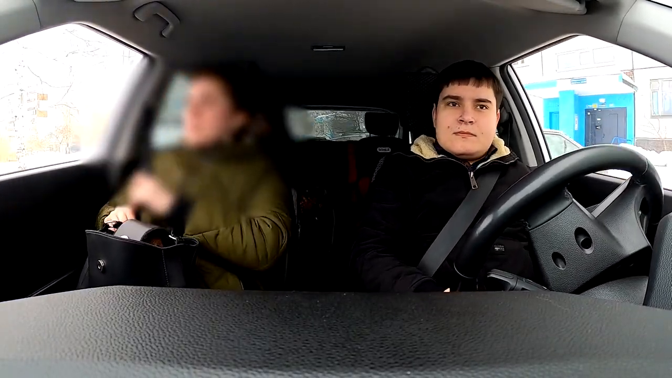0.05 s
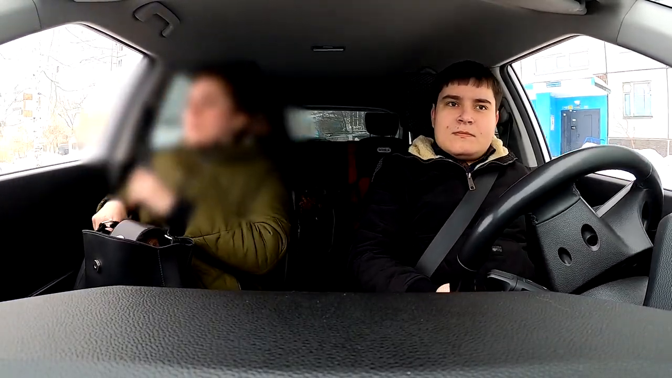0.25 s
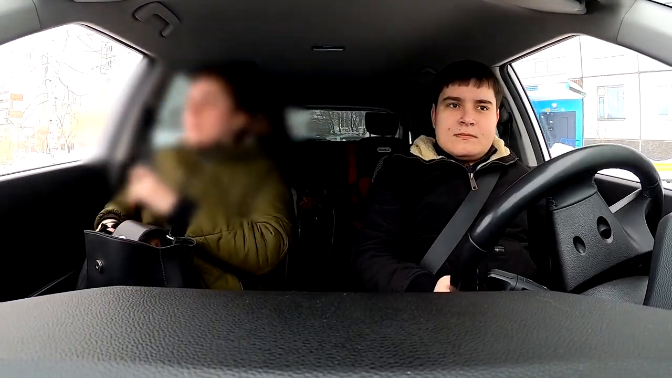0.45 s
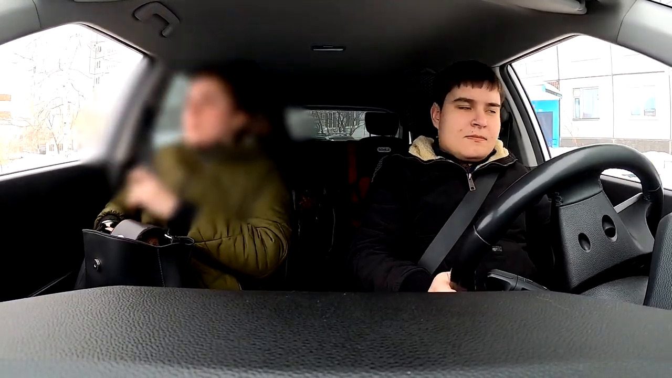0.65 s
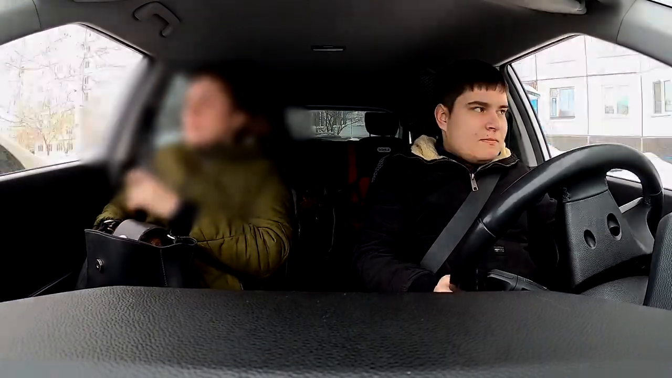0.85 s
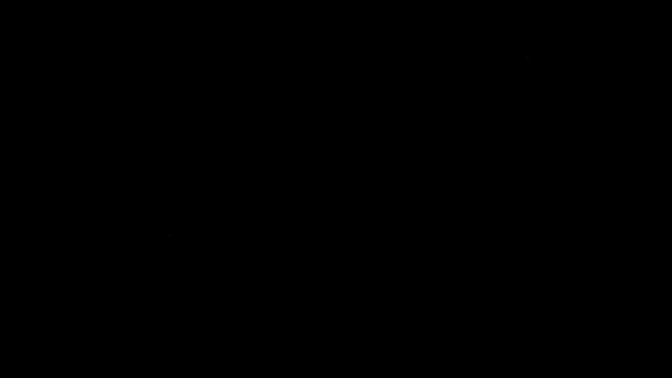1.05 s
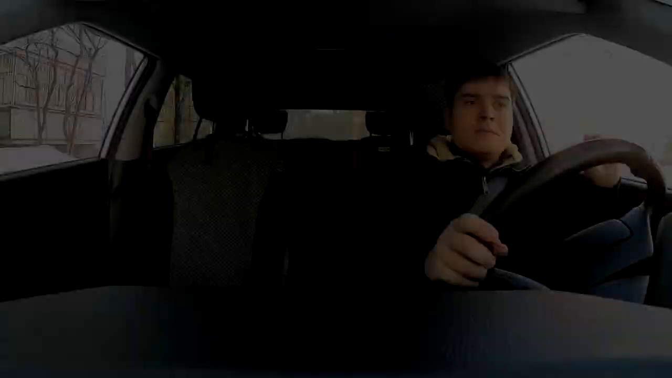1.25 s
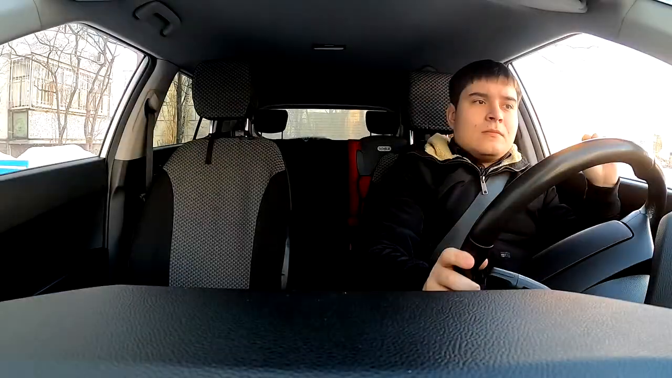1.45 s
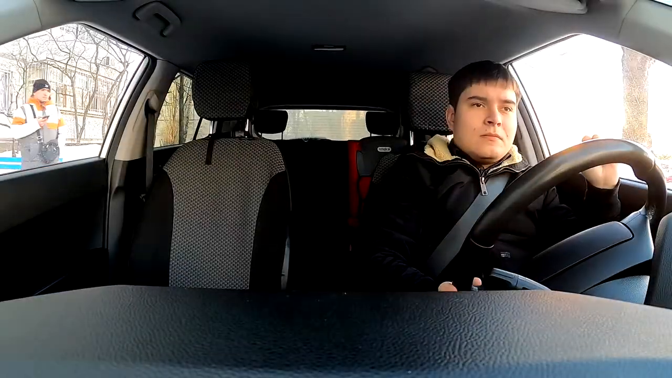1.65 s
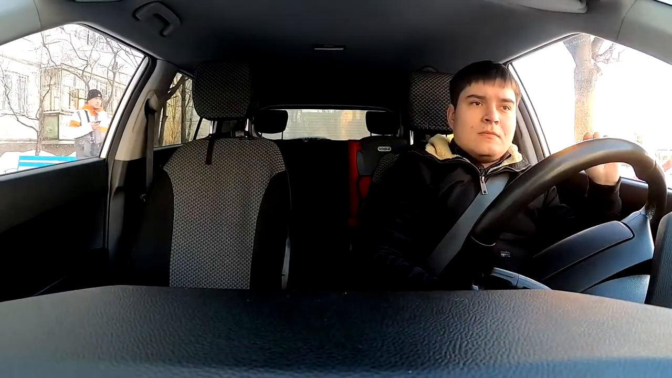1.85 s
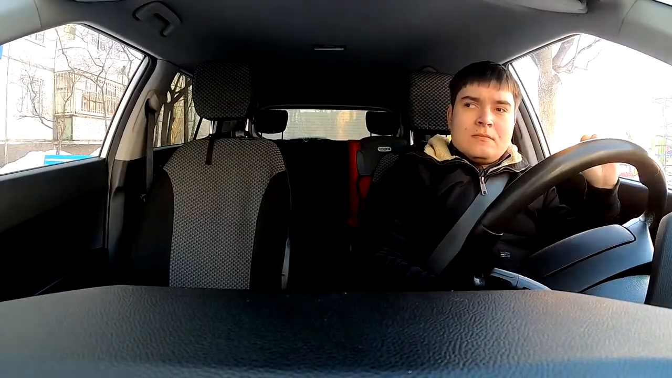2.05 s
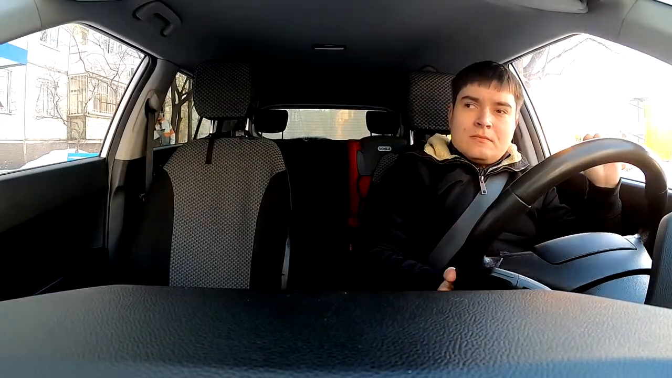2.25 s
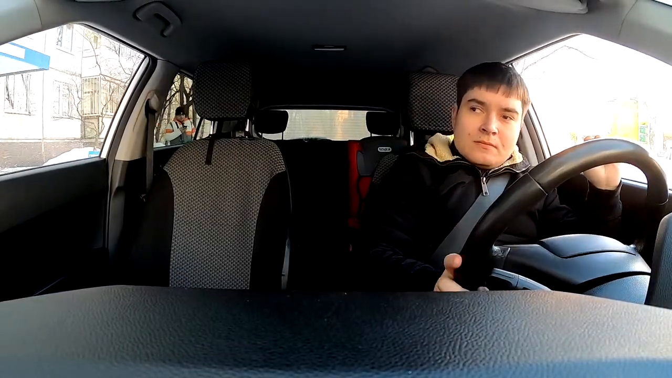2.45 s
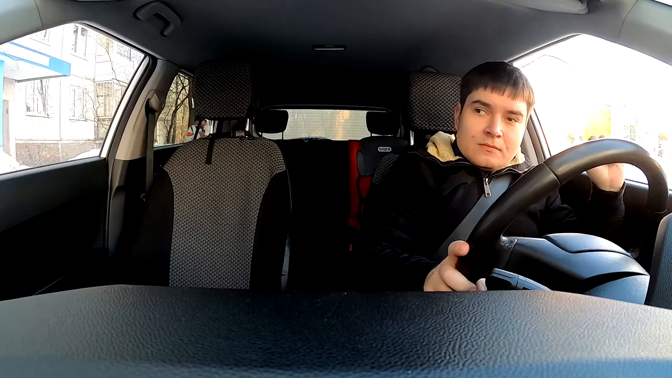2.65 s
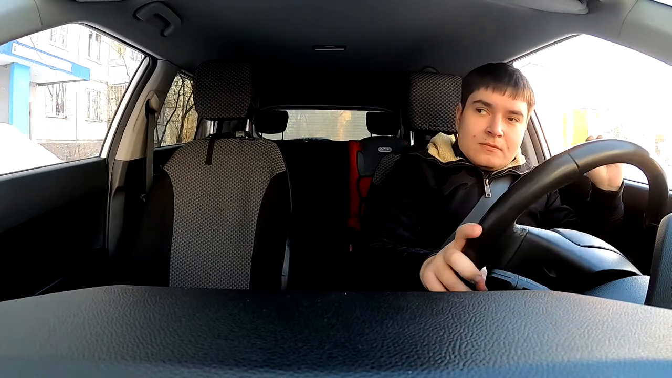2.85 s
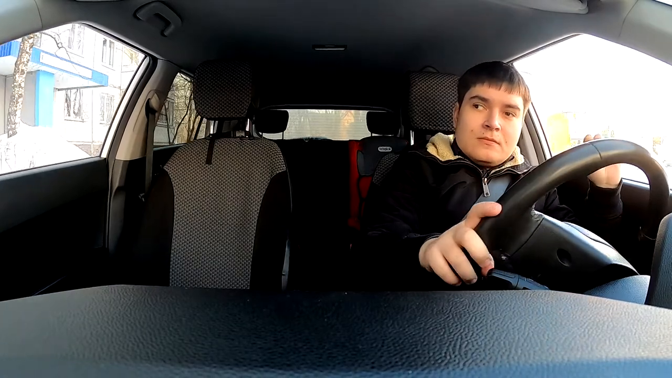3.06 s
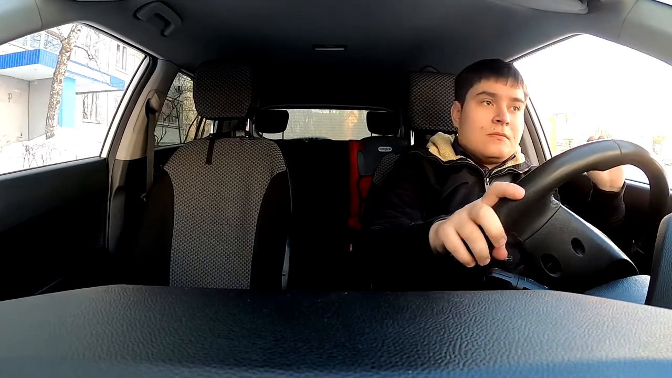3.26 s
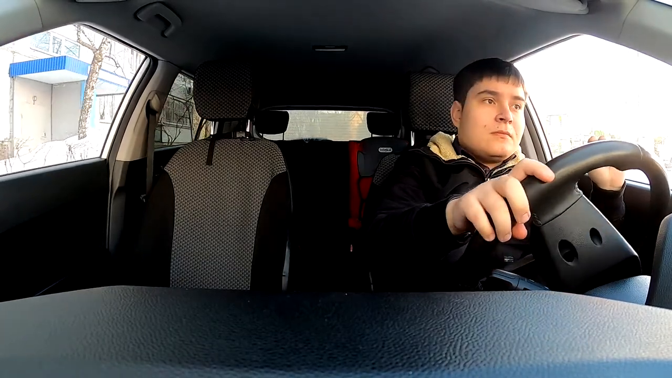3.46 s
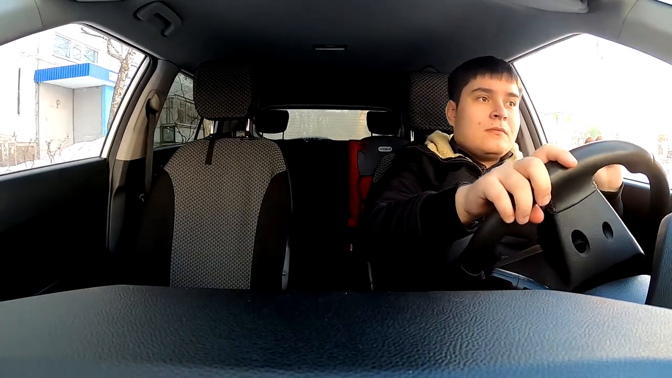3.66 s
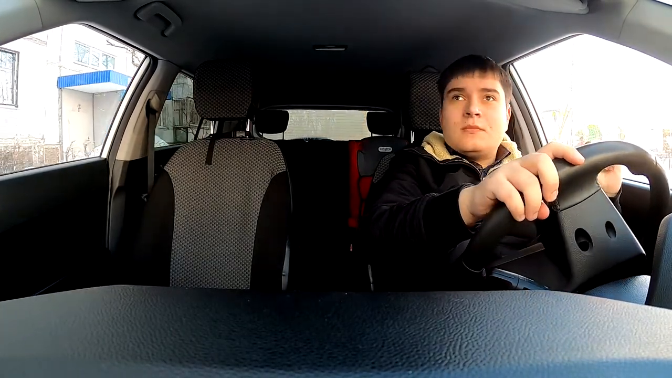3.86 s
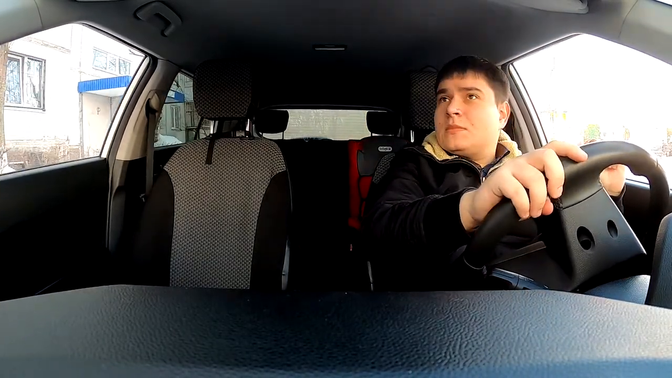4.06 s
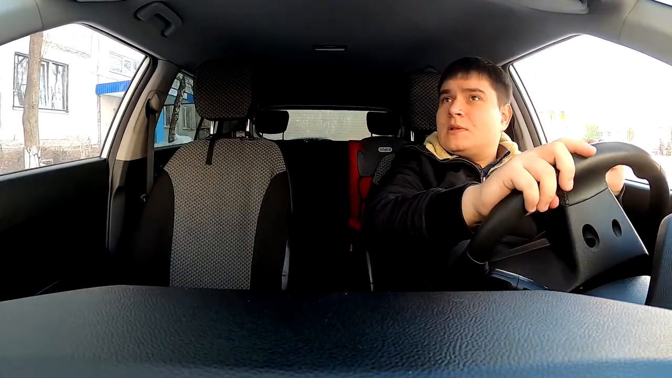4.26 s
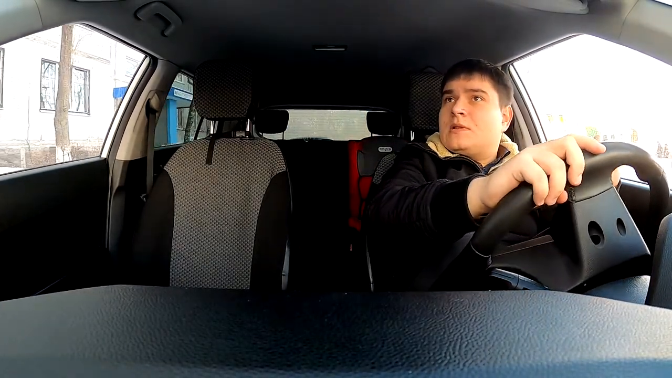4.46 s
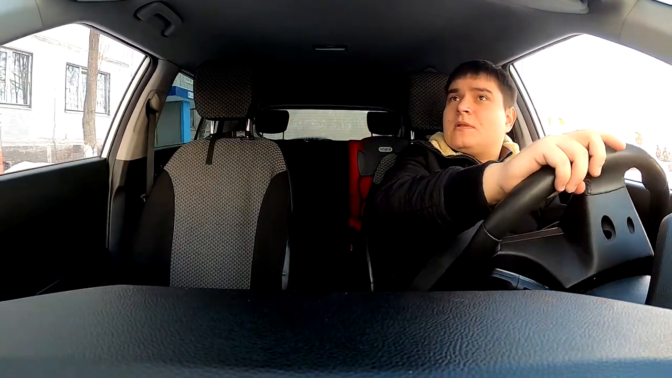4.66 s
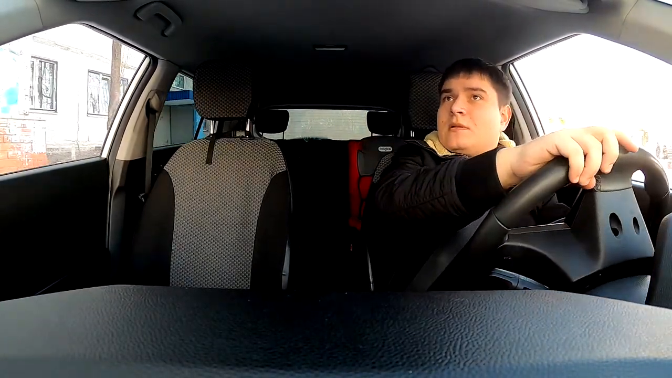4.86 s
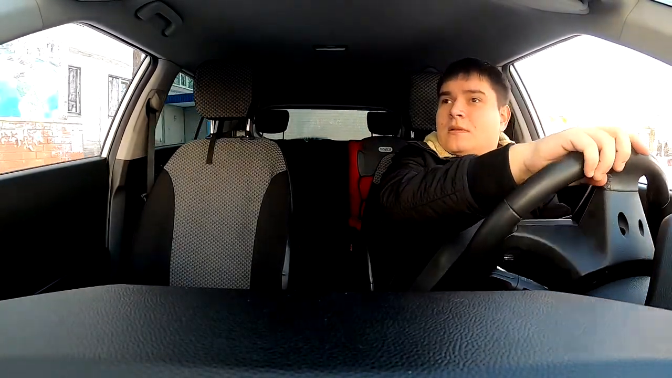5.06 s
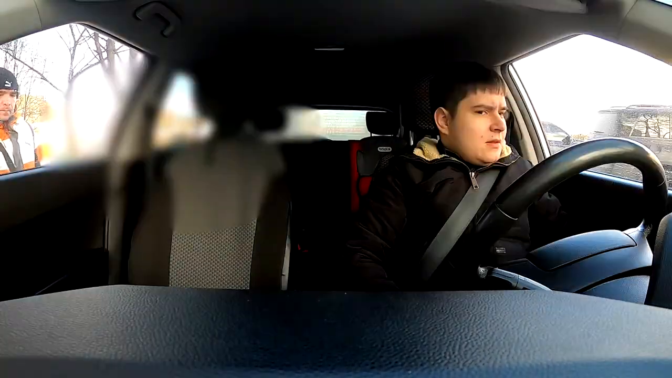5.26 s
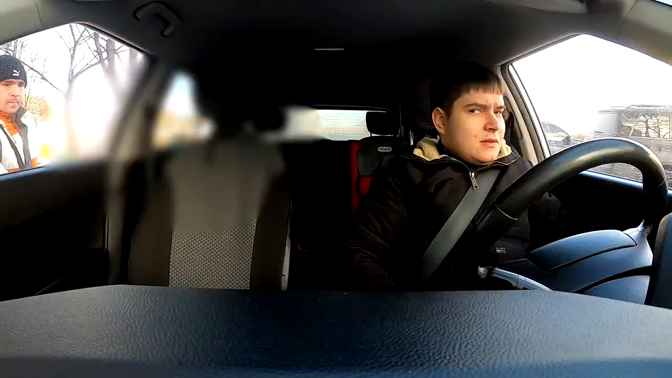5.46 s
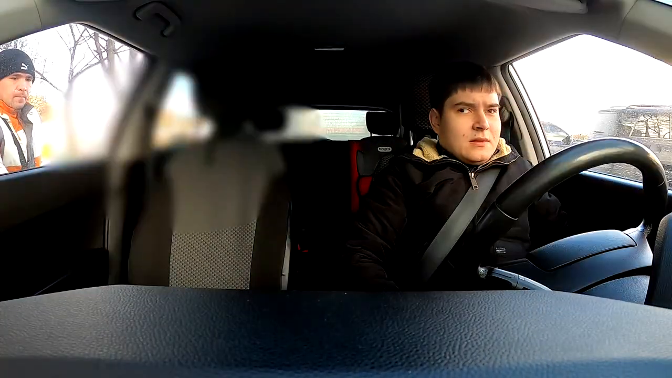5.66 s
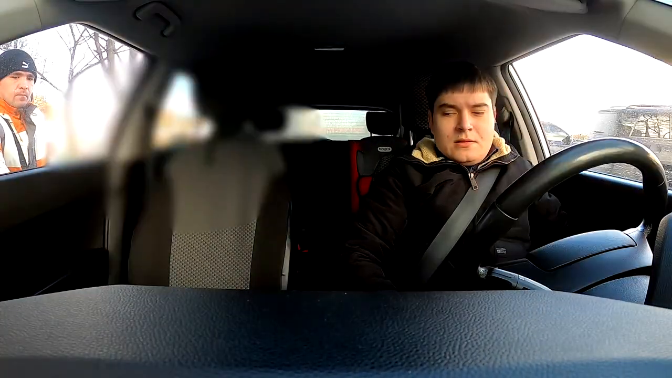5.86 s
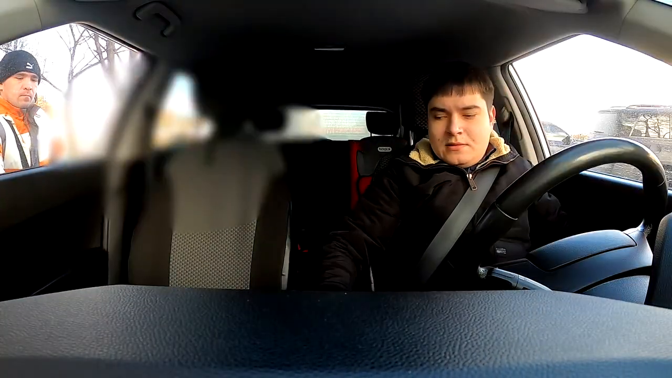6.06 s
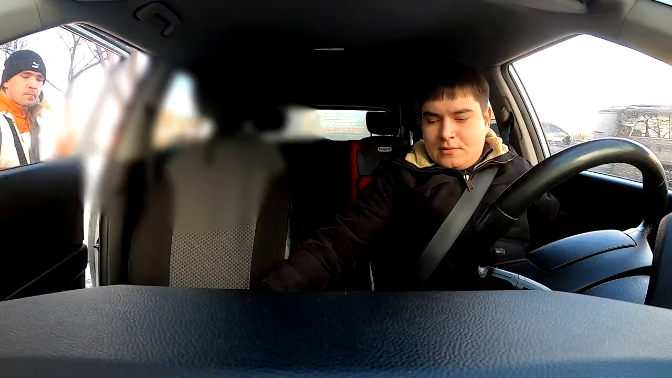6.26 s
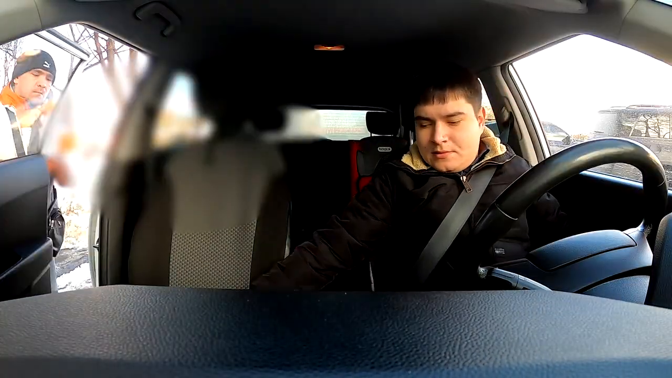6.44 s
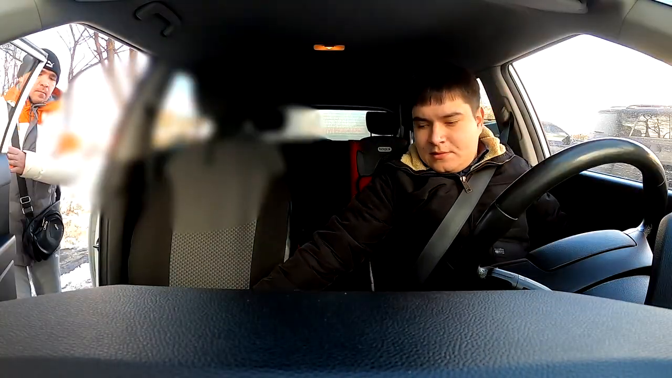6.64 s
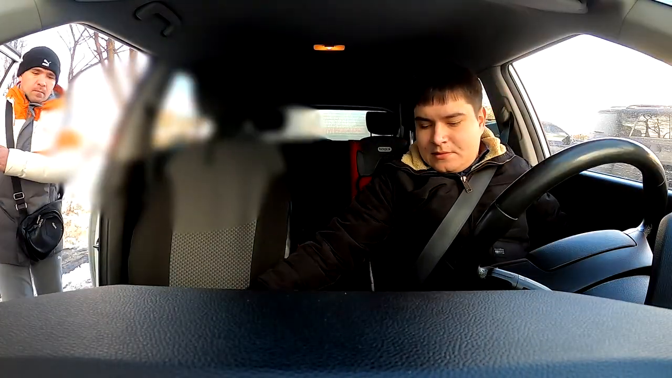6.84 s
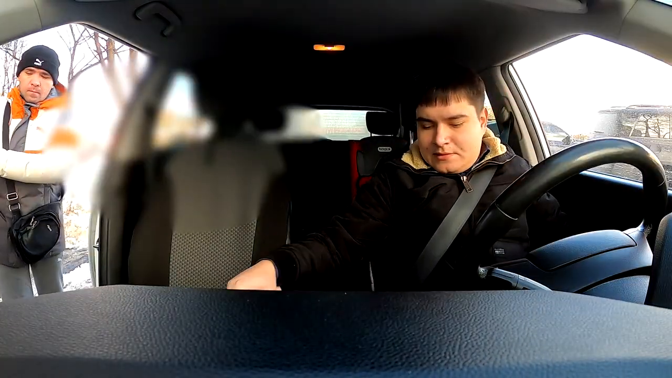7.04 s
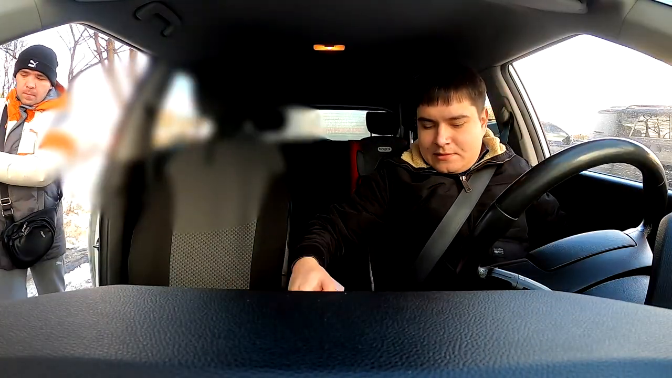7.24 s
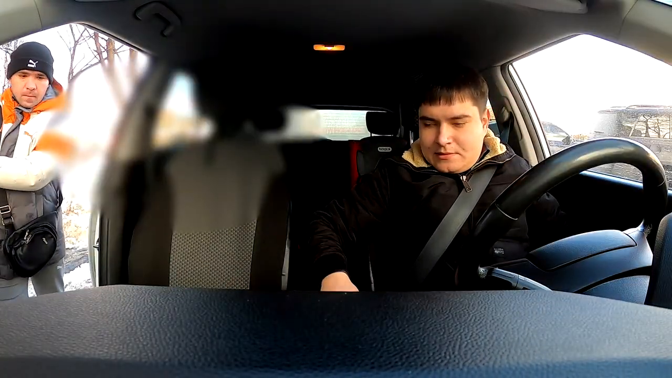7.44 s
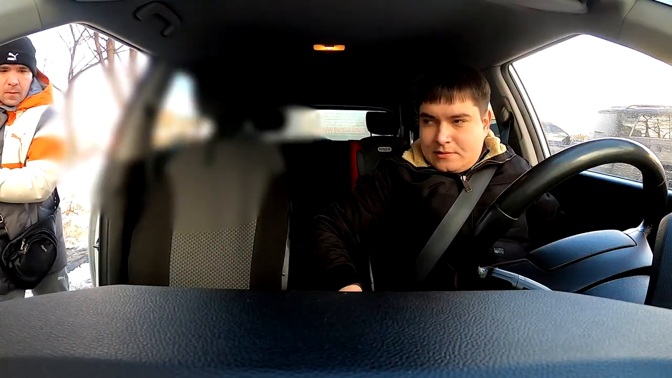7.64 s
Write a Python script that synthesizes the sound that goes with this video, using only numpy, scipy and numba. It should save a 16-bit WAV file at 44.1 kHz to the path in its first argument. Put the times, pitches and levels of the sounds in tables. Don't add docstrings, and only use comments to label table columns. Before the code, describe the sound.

Inside a small car on a rough street, a deep body boom and road drone dominate, with faint tyre hiss, cloth rustles and trim ticks. It dips nearly silent around one second, then drives on with soft rut thuds. A hard cut brings a low idle; a latch clunks, the door whumps open, its stay knocks, and a bag scrapes and clicks. Close dashboard stereo microphone, bass heavy.

```python
import sys
import numpy as np
from scipy import signal
from scipy.fft import rfft, irfft
from scipy.io import wavfile
from scipy.ndimage import uniform_filter1d
from numba import njit

SR = 44100
rng = np.random.default_rng(int(sys.argv[2]) if len(sys.argv) > 2 else 0)


def wav_out(sig):
    wavfile.write(sys.argv[1], SR, np.round(np.clip(np.atleast_2d(sig).T, -1, 1) * 32767).astype(np.int16))


def nominal_scale(level):
    x = np.asarray(level, float) / 20
    return 10 ** x


N = 339570
TIME = np.arange(N) / SR
FADE_S, CUT_S = 1.123, 5.1582

# t/s, level/dB
ROAD = [(0.0, -21.5), (0.35, -19.5), (0.43, -18), (0.55, -20.5), (0.62, -15), (0.82, -22), (1.44, -18.5),
        (1.7, -22.5), (2.05, -17.5), (2.5, -21.5), (3.02, -19.5), (3.19, -29.5), (3.55, -18), (3.91, -24),
        (4.28, -20), (4.46, -27), (4.76, -19.5), (5.15, -24.5)]
# t/s, drone level/dB, tyre level/dB
JOLTS = [(0.02, -33.5, -61), (0.41, -29, -59.5), (2.0, -32, -71), (2.59, -25, -61), (3.02, -30.5, -66.5),
         (3.419, -32.5, -70), (3.57, -28, -59.5), (3.919, -32, -74.5), (4.4, -33, -75), (4.81, -34.5, -63),
         (5.0, -33.5, -63), (5.15, -36, -57)]
# t/s, level/dB
IDLE = [(5.17, -47), (5.2, -28), (5.68, -28.5), (5.85, -29.5), (6.05, -28.5), (6.17, -18), (6.23, -29),
        (6.31, -36.5), (6.37, -31), (6.49, -36.5), (6.53, -28), (6.79, -25), (6.98, -28), (7.11, -23),
        (7.26, -25.5), (7.48, -21.5), (7.66, -24), (7.7, -25.5)]


@njit
def svf(x, hz, width):
    y, b, l = np.empty(len(x)), 0., 0.
    g, k = np.tan(np.pi * hz / SR), width / hz
    for i in range(len(x)):
        v = (b + g * (x[i] - l)) / (1 + g * (g + k))
        b, l, y[i] = 2 * v - b, l + 2 * g * v, k * v
    return y


def unit(x):
    return x / np.sqrt(np.mean(x ** 2))


def band(x, hz, width):
    hz, width = float(hz), float(width)
    return unit(np.array([svf(svf(h, hz, width), hz, width) for h in x]))


def curves(table):
    return np.interp(TIME, *np.transpose(table))


def along(table, hz):
    f, value = np.transpose(table)
    return np.interp(np.log(hz + 1e-9), np.log(f), value)


def walk(rate):
    hold = int(SR / rate)
    steps = np.repeat(rng.standard_normal(N // hold + 1), hold)
    return 1.3 * uniform_filter1d(uniform_filter1d(steps, hold), hold)[:N]


def noise(spectrum, flicker_db, rate, grit_db=0):
    hz = np.fft.rfftfreq(N, 1 / SR)
    low, top = spectrum[0][0], spectrum[-1][0]
    grains = nominal_scale(grit_db * np.repeat(rng.exponential(size=N // 64 + 1), 64)[:N])
    source = rfft(rng.standard_normal((2, N)) * grains)
    source = source * nominal_scale(along(spectrum, hz)) * (hz > low) * (hz < top)
    out = 0
    for centre in np.arange(np.log2(low), np.log2(top) + 1):
        share = np.clip(1 - np.abs(np.log2(hz + 1e-9) - centre), 0, 1)
        out = out + irfft(source * share, N) * nominal_scale(flicker_db * walk(rate))
    return unit(out)


def burst(t0, rise, t60):
    t = np.clip(TIME - t0, 0, None)
    return (1 - np.exp(-t / rise)) * np.exp(-np.log(1000) * t / t60)


def swell(s, rise, fall, db):
    return nominal_scale(db - 20 * np.maximum((s - TIME) / rise, (TIME - s) / fall)) ** 2


def jolted(level_db, column):
    power = sum(swell(row[0], 0.09, 0.14, row[column]) for row in JOLTS)
    return np.sqrt(nominal_scale(level_db) ** 2 + power)


def engine(hz, orders, wobble):
    phase = 2 * np.pi * np.cumsum(hz * (1 + wobble * walk(2))) / SR
    return unit(sum(nominal_scale(db + walk(11)) * np.sin(k * (phase + 1)) for k, db in orders))


def pumps(rows):
    out = np.zeros((2, N))
    quarter_turn = np.array([[0], [.25]])
    for s, db, hz, turns in rows:
        near = slice(int((s - 2 * turns / hz) * SR), int((s + 2 * turns / hz) * SR))
        t = (TIME[near] - s) * hz
        out[:, near] += nominal_scale(db) * np.exp(-(2 * t / turns) ** 2) * np.sin(2 * np.pi * (t + quarter_turn))
    return out


def stick_slip(rows):
    hiss = rng.standard_normal((2, N)) * nominal_scale(2.2 * walk(120))
    skirt, out = band(hiss, 2800, 3000), 0
    for s, length, db, hz, width in rows:
        part = np.clip((TIME - s) / length, 0, 1)
        pressure = np.sin(np.pi * part ** .8)
        out = out + nominal_scale(db) * pressure * (band(hiss, hz, 0.86 * width) + nominal_scale(-27) * skirt)
    return out


def body_boom():
    # f/Hz, level/dB
    boom = [(5.9, -33.5), (10, -5.5), (22, -1.5), (38, 0.5), (50, -1.5), (90, -21.5), (120, -49),
            (200, -120)]
    crawl = nominal_scale(-3) * engine(32.3, [(1, 0), (2, -21.5)], wobble=0.04043)
    return nominal_scale(curves(ROAD) + 1.0) * (noise(boom, 0.62, 15) + crawl)


def road_drone():
    # f/Hz, level/dB
    first_street = [(35, -27.5), (60, -7), (97, -13.5), (128, -16), (157, -29), (206, -21), (233, -30),
                    (273, -31), (314, -29.5), (393, -39), (560, -50.5), (730, -77), (1230, -120)]
    # f/Hz, level/dB
    second_street = [(35, -21.5), (60, -11.5), (81, -8.5), (129, -9.5), (156, -17), (189, -15),
                     (299, -30.5), (351, -28.5), (385, -38), (501, -43.5), (560, -43), (730, -74.5),
                     (1230, -120)]
    shake, first = curves(ROAD), TIME < FADE_S
    level = jolted(np.where(first, -29, -34) + 0.34 * (shake - np.mean(shake)), column=1)
    return level * np.where(first, noise(first_street, 0.8, 8.2), noise(second_street, 1.0, 9))


def tyre_hiss():
    # f/Hz, level/dB
    tread = [(260, -26.5), (450, 0.5), (545, -7), (588, -8), (911, -10.5), (1020, -11.5), (1500, -22),
             (1950, -45), (3300, -120)]
    shake = curves(ROAD)
    level = jolted(np.where(TIME < FADE_S, -63.5, -68.5) + .1 * (shake - np.mean(shake)), column=2)
    return level * nominal_scale(6.5) * noise(tread, 1.0, 14, grit_db=1.5)


def cloth():
    # f/Hz, level/dB
    bright = [(1410, -29), (2400, -17), (2670, -6), (3390, -5), (3800, -2), (5980, -10), (8000, -12),
              (10600, -27), (12300, -42), (15000, -41.5)]
    # f/Hz, level/dB
    dull = [(650, -40), (1100, -3), (1550, 1), (1850, -1.5), (2210, -5), (2300, -6), (2600, -4),
            (3380, -19.5), (5720, -120)]
    # t/s of the peak, rise/s, fall/s, level/dB, dull share/dB
    slides = [(0.08, .4, 0.079, -58, -2), (0.22, 1, 0.84, -63, 2), (0.356, .04, 0.059, -52, -4.5),
              (0.49, .4, 0.18, -62.5, -1.5), (0.73, 0.15, 0.045, -59, -5.5), (0.86, 0.49, 0.72, -65, -1),
              (1.385, 0.071, 0.13, -58, -6), (1.61, 0.4, 0.72, -60.5, 0.5), (1.94, 0.28, 0.16, -60, 0.5),
              (2.02, 0.42, 0.041, -61.5, 5), (2.22, 0.2, 0.41, -67.5, 0.5), (2.593, 0.054, 0.035, -61, 7),
              (2.648, .07, 0.038, -58.5, 3.5), (3.0, 0.13, 0.39, -68, 3.5), (3.2, .3, 0.13, -70, 2),
              (3.335, 0.14, 0.23, -65.5, -2), (3.59, 0.22, 0.16, -65.5, 3.5), (3.81, 0.21, 0.088, -64.5, 2),
              (4.27, 0.086, .2, -61, -4), (4.42, .15, 2.5, -68, 1), (4.9, 0.22, 0.28, -63.5, 2.5),
              (5.14, .06, .3, -77, 8)]
    still_db = -78.5
    high = np.sqrt(nominal_scale(still_db) ** 2 + sum(swell(*row[:4]) for row in slides))
    low = np.sqrt(nominal_scale(still_db + 3) ** 2 + sum(swell(s, up, down, db + more) for s, up, down, db, more in slides))
    return high * noise(bright, 0.9, 30, grit_db=1.0) + low * noise(dull, 0.98, 30, grit_db=-0.5)


def mic_hiss():
    # f/Hz, level/dB
    hiss = [(880, -31), (1500, 0.5), (1730, -0.5), (2380, -8), (2550, -7), (3090, -10.5), (8020, -15),
            (10200, -32), (15000, -41.5)]
    return nominal_scale(-74) * noise(hiss, 0.91, 5.4)


def rolling():
    out = body_boom() + road_drone() + tyre_hiss() + cloth() + mic_hiss()
    return out * np.clip(np.abs(TIME - FADE_S) / 0.25, .02, 1)


def ticks():
    # t/s, peak level/dB, creak level/dB, f/Hz
    creaks = [(0.0, -55, -54, 4070), (0.3537, -39.5, -45, 4030), (0.4848, -52, -53, 4170),
              (1.337, -50, -69, 4190), (1.381, -44, -57, 4300), (1.394, -44, -56, 4500),
              (1.419, -51, -64, 4250), (2.527, -58, -64, 3940), (2.5671, -68, -59, 3820),
              (2.5877, -69, -54, 4090), (2.635, -49, -60.5, 3960), (3.1857, -58, -58, 4350),
              (3.261, -59, -67, 4360), (3.292, -53, -62, 3900), (3.334, -45.5, -53.5, 4170),
              (3.348, -51.5, -58, 4300), (3.5618, -54, -63, 4030), (3.578, -51, -63, 4190),
              (3.8894, -66, -57, 3870), (4.185, -59, -58, 4080), (4.244, -59, -60, 3960),
              (4.27, -41.5, -59, 4530), (4.3924, -58, -62, 3800), (4.887, -45.5, -61, 4900),
              (4.888, -47, -67, 3000), (5.1254, -66, -51, 3960), (6.463, -57, -39, 3910),
              (6.9169, -55, -46, 4060), (7.017, -61, -26, 3870)]
    hiss = rng.standard_normal((2, N))
    low = band(hiss, 1500, 1900)
    out = np.zeros((2, N))
    for s, db, low_db, hz in creaks:
        t60 = 0.046 if s < CUT_S else 0.023
        near = slice(int(s * SR), int((s + .3) * SR))
        bright = band(hiss[:, near], hz, 0.55 * hz)
        out[:, near] += nominal_scale(db - 1.0) * burst(s, 0.00091, t60)[near] * bright
        out[:, near] += nominal_scale(low_db) * burst(s, 0.0013, 1.64 * t60)[near] * low[:, near]
    return out


def palms():
    # t/s, length/s, level/dB, centre f/Hz, width/Hz
    rubs = [(.03, .6, -64, 780, 70), (1.48, .27, -66, 3900, 1000), (1.83, .21, -63, 3850, 800),
            (1.83, .21, -68, 2750, 400), (1.86, .18, -63, 1600, 400), (4.05, .3, -71, 1400, 300),
            (4.86, .08, -63, 800, 400), (3.55, .35, -63, 500, 100)]
    return stick_slip(rubs)


def ruts():
    # t/s, peak level/dB, f/Hz, length/cycles
    bumps = [(2.19, -30.5, 135, 12), (2.845, -30, 175, 4), (2.99, -28, 205, 4), (2.64, -36, 260, 6),
             (4.5, -28, 86, 8.4), (5.72, -33.5, 80, 4), (7.26, -34.5, 120, 5.7), (2.595, -21, 152, 3.1),
             (2.6, -28, 84.7, 4.9), (2.93, -28.5, 185.7, 7.1), (3.025, -29, 195, 4), (3.83, -44.5, 367, 12),
             (4.81, -21, 85.4, 3.7), (5.128, -32, 149, 1.3)]
    return pumps(bumps)


def idling():
    orders = [(1, 0), (2, -17), (3, -30), (9, -30)]
    return nominal_scale(curves(IDLE)) * engine(20.74, orders, wobble=0.01157)


def cabin_hum():
    # f/Hz, level/dB
    hum = [(16, -29.5), (28, -4.5), (36, -5.5), (44, -9.5), (65, -15), (97, -16), (114, -20), (154, -20),
           (187, -16), (348, -29.5), (391, -31.5), (438, -34.5), (659, -45), (915, -45.5), (1400, -65.5),
           (1820, -90), (3080, -120)]
    # t/s, level/dB
    shudders = [
        (5.97, -24),
        (6.09, -20),
        (6.18, -27),
    ]
    usual_db = np.median(np.transpose(IDLE)[1])
    power = nominal_scale(-34.5 + 0.27 * (curves(IDLE) - usual_db)) ** 2
    power = power + sum(swell(s, 0.055, 0.042, db) for s, db in shudders)
    return np.sqrt(power) * noise(hum, 0.85, 9.7)


def street_air():
    # f/Hz, level/dB
    street = [(260, -16.5), (450, -1.5), (586, -2.5), (659, -12.5), (1180, -8.5), (1270, -6.5),
              (1390, -5.5), (2600, -19.5), (3380, -44), (5720, -120)]
    # f/Hz, level/dB
    street_top = [(1410, -21.5), (2400, -6), (2960, -8), (3350, -6.5), (7700, -14.5), (8520, -16),
                  (10700, -32), (12400, -29), (15400, -45)]
    # t/s, level/dB under wide open
    opening = [(5.17, -34), (5.24, -32), (5.85, -24), (5.98, -3), (6.12, -7), (6.49, -12), (6.81, -16),
               (6.92, -11), (7.26, -6.5), (7.68, 0)]
    gap = curves(opening)
    out = nominal_scale(-46.5 + 0.72 * gap) * noise(street, 1.7, 25, grit_db=-1.0)
    return out + nominal_scale(-47.5 + gap) * noise(street_top, 0.97, 23, grit_db=1)


def parked():
    return idling() + cabin_hum() + street_air()


def metal_crunch():
    # t/s, level/dB, decay at 1 kHz/s, treble tilt/(dB per octave)
    cracks = [(5.917, -31, 0.1, -8), (5.936, -41, 0.063, -21), (6.073, -35, 0.09, -4.5),
              (6.086, -29.5, 0.11, -19), (6.5845, -25, 0.11, -9), (6.603, -38.5, 0.41, -26),
              (6.70, -41.5, 0.098, -6.5), (6.918, -52, 0.03, -9)]
    out = np.zeros((2, N))
    grit = rng.standard_normal((2, N)) * nominal_scale(1.9 * walk(250))
    for octave in np.arange(0, 3.5, .5):
        part = band(grit, 1000 * 2 ** octave, 550 * 2 ** octave)
        for s, db, t60, tilt_db in cracks:
            level = nominal_scale(db + tilt_db * abs(octave - .5))
            out += level * burst(s, 0.00072, t60 * 2 ** (-.4 * octave)) * part
    return out


def door_panel():
    # f/Hz, level/dB, t60/s
    latch = [(54, -14.5, 0.12), (94.5, -7, 0.26), (204.2, -7, 0.15), (251, -6.5, 0.12), (335, -9.5, 0.087),
             (388.5, 2, 0.098), (503, -15.5, 0.055), (1034, -7.5, 0.069)]
    # f/Hz, level/dB, t60/s
    stay = [(91.3, -2.5, 0.22), (120.5, -4.5, 0.15), (142, 4, 0.088), (206, -6, 0.13), (256, -13, 0.14),
            (345.7, 3, 0.086), (500, -14.5, 0.15), (560, -13, 0.06), (1050, 1, .03), (780, -10.5, .03)]
    # t/s, level/dB, rattle length/s, contact/ms
    blows = [(5.919, -12.5, 0.07, 1.42), (6.076, -13, 0.0085, 1.6), (6.083, -10, 0.051, 0.15),
             (6.1, -19.5, 0.065, 0.45), (6.585, -11, 0.026, 1.1), (6.6, -11, 0.03, 0.97),
             (6.651, -18, 0.029, 3.5)]
    out, hiss = np.zeros((2, N)), rng.standard_normal(N)
    for s, db, length, contact_ms in blows:
        push = burst(s, 0.0024, length) * hiss
        for hz, mode_db, t60 in (latch if s < 6.3 else stay):
            ring = svf(push, 1. * hz, np.log(1000) / np.pi / t60)
            ring = svf(ring, 1. * hz, hz / 2)
            soft = 1 / (1 + (hz * contact_ms / 500) ** 2)
            out[0] += nominal_scale(db + mode_db - 5.5) * soft * ring / np.abs(ring).max()
    return out


def snaps():
    # t/s, peak level/dB, f/Hz, length/cycles
    rings = [(5.919, -32, 1240, 7.5), (5.919, -37, 2200, 10), (5.925, -34, 500, 3), (5.929, -36, 1976, 13),
             (5.931, -35, 1290, 11), (5.943, -36, 1040, 8), (5.934, -22, 100, 2), (5.952, -28, 250, 5),
             (5.932, -24, 350, 6), (6.058, -43, 1500, 28), (6.075, -38, 2000, 8), (6.089, -26, 1012, 7.7),
             (6.089, -33, 1990, 13), (6.09, -33, 700, 4), (6.097, -16, 260, 1.3), (6.113, -35, 1120, 6),
             (6.133, -40, 1030, 5), (6.465, -44, 1500, 5), (6.919, -38, 2200, 2), (6.922, -50, 3200, 8),
             (6.587, -27.5, 2400, 14), (6.59, -23.5, 1050, 12), (6.589, -25.5, 780, 7),
             (6.591, -25, 560, 5), (6.6, -29, 1260, 20), (6.603, -34, 2800, 20), (6.615, -35.5, 1760, 25),
             (6.606, -19, 345, 6), (6.591, -13, 220, 1.5), (6.612, -17, 280, 3), (6.608, -13, 175, 4),
             (6.642, -36.5, 1250, 14), (6.64, -26.5, 340, 5), (6.659, -17, 100, 3), (6.685, -18.5, 130, 3),
             (6.705, -34, 1230, 9), (6.715, -41, 1350, 12), (6.733, -34.5, 1330, 13),
             (6.998, -36, 1650, 10), (7.004, -34, 1150, 8), (7.02, -29, 1400, 8), (7.021, -32.5, 2650, 14),
             (7.028, -32, 1250, 12), (7.045, -24.5, 1760, 15), (7.045, -40, 4100, 12),
             (7.058, -31, 1700, 9.1), (7.069, -32, 1650, 14), (7.077, -33, 1200, 10), (7.09, -35, 1300, 9),
             (7.1, -37, 1350, 5)]
    return pumps(rings)


def bag():
    # t/s, length/s, level/dB, centre f/Hz, width/Hz
    bag_scrapes = [(6.035, .062, -54, 1500, 460), (6.11, .08, -51, 1300, 1200),
                   (6.698, .04, -46, 1500, 1100), (6.98, .045, -41, 1600, 1500),
                   (7.016, .024, -36, 1900, 1700), (7.018, .055, -50, 3800, 1200),
                   (7.02, .075, -32, 1500, 1100), (7.002, .11, -39, 340, 150), (7.01, .06, -38, 670, 300),
                   (7.039, .014, -31, 1400, 900), (7.192, .022, -50, 1480, 600),
                   (7.262, .04, -46, 1220, 500), (7.31, .03, -51, 1400, 500), (7.492, .056, -35, 1250, 400),
                   (7.655, .03, -45, 1090, 500), (7.652, .03, -42, 500, 300),
                   (7.502, .024, -46.5, 3000, 2200), (7.612, .07, -47, 2300, 1700),
                   (7.501, .04, -47.5, 660, 400)]
    return stick_slip(bag_scrapes)


def door_air():
    # t/s, peak level/dB, f/Hz, length/cycles
    whumps = [(6.079, -7.5, 120, 0.78), (6.118, -11, 21.7, 0.51), (6.164, -11.5, 24.3, 1.13),
              (6.182, -13, 45, 1.5), (6.215, -20, 50, 3)]
    return pumps(whumps)


def stereo(x, other):
    # f/Hz, likeness/(0-1)
    likeness = [(60, 0.99), (130, 0.97), (290, 0.99), (640, 0.7), (1400, 0.57), (3090, 0.36), (6790, 0.05),
                (14900, 0)]
    # f/Hz, left minus right level/dB
    left_lean = [(60, 0.5), (110, 1), (200, 1.5), (380, 3), (700, 4.5), (1290, 2), (2370, 4), (4380, 1.5),
                 (8090, 1.5), (14900, 0.5)]
    hz = np.fft.rfftfreq(N, 1 / SR)
    like = np.clip(along(likeness, hz), 0, 1)
    mid, side = rfft(x) * np.sqrt(1 + like), rfft(other) * np.sqrt(1 - like)
    lean = nominal_scale(along(left_lean, hz) / 2) / np.sqrt(2)
    return np.array([irfft((mid + side) * lean, N), irfft((mid - side) / lean / 2, N)])


def scene():
    small = ticks() + palms() + ruts() + metal_crunch() + door_panel() + snaps() + bag() + door_air()
    small = signal.sosfilt(signal.butter(4, 8300, fs=SR, output="sos"), small)
    small[1] *= nominal_scale(-1.5)
    before, after = stereo(*(rolling() + small)), stereo(*(parked() + small))
    before[0] = np.roll(before[0], shift=2)
    cut = int(CUT_S * SR)
    gap = after[:, cut] + .06 - before[:, cut]
    before += gap[:, None] * np.exp(-((TIME - CUT_S) / .004) ** 2)
    splice = np.clip((TIME - CUT_S) * SR, 0, 1)
    return before + splice * (after - before)


def top_cut(x):
    return signal.sosfilt(signal.butter(12, 15540, fs=SR, output="sos"), x)


def record(dry):
    top = .75
    return top_cut(top * np.tanh(dry / top))


dry = scene()
out = record(dry)
wav_out(out)
```